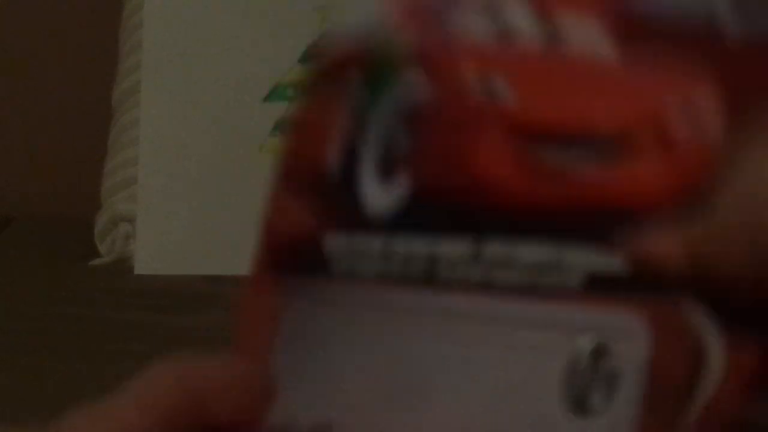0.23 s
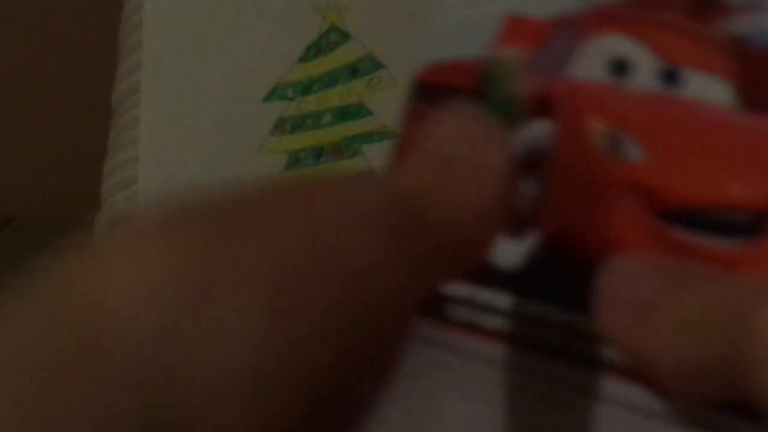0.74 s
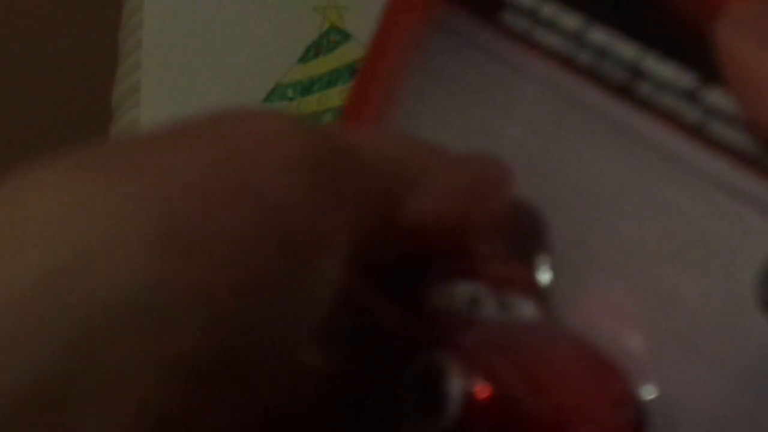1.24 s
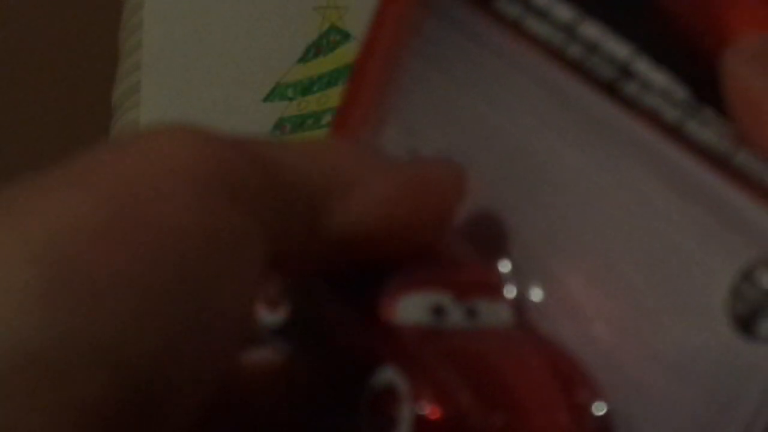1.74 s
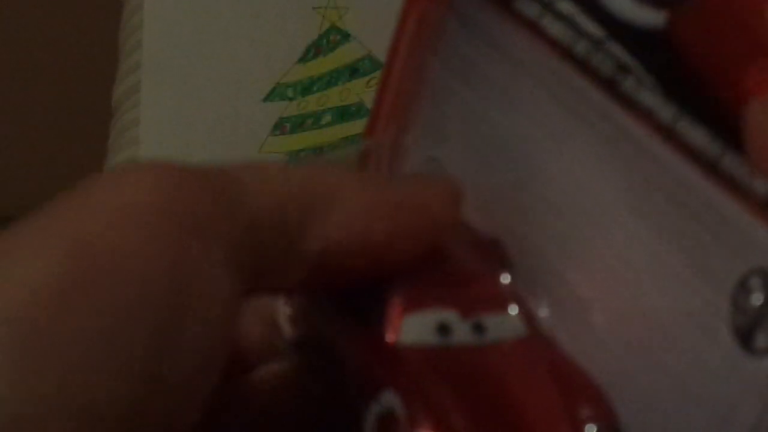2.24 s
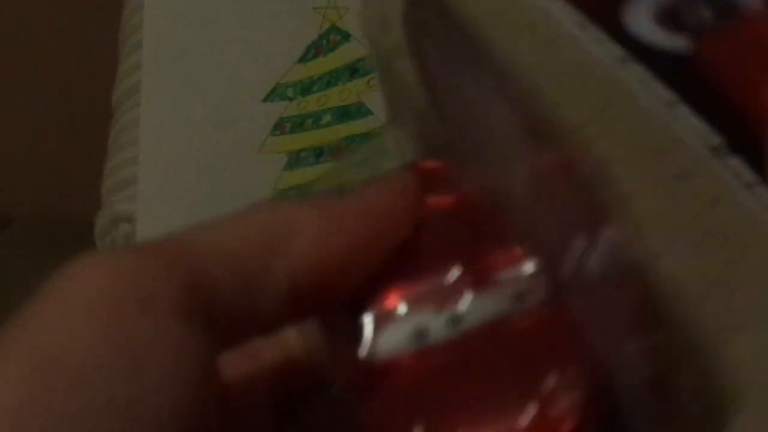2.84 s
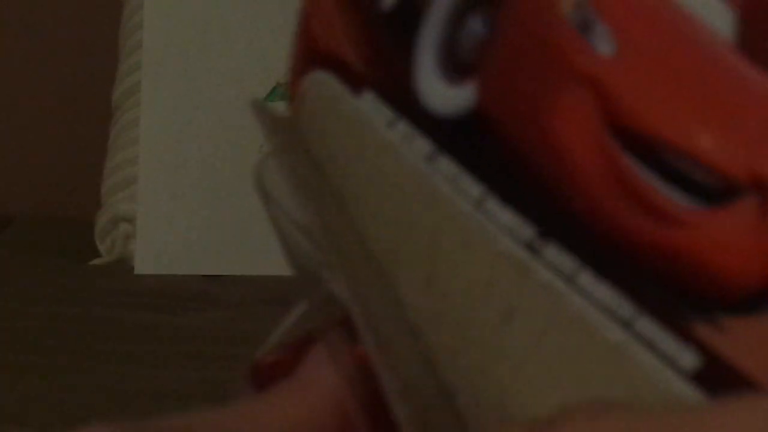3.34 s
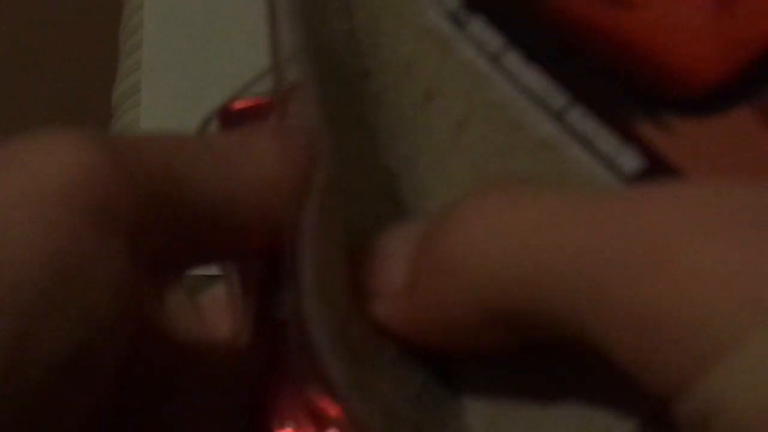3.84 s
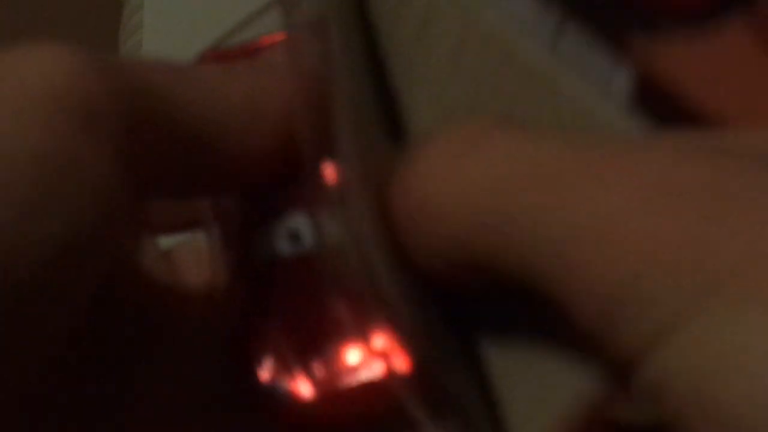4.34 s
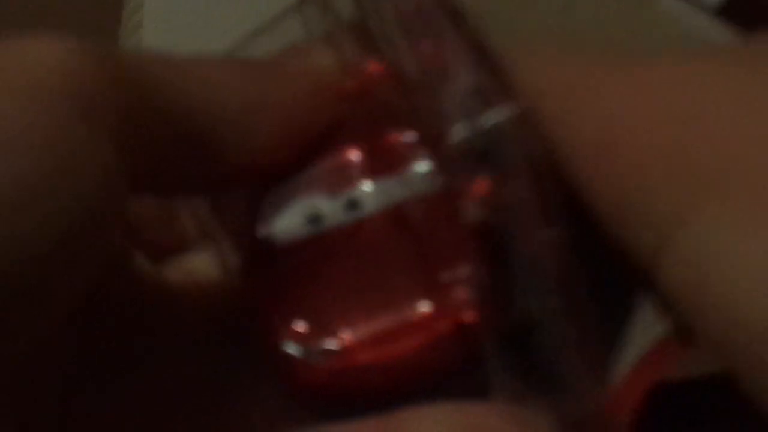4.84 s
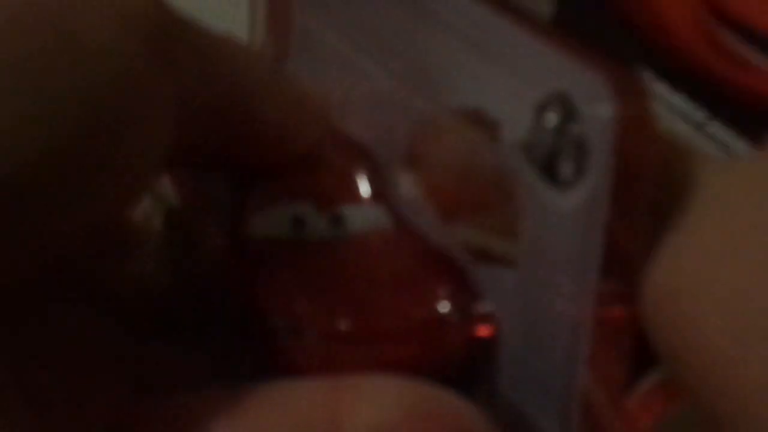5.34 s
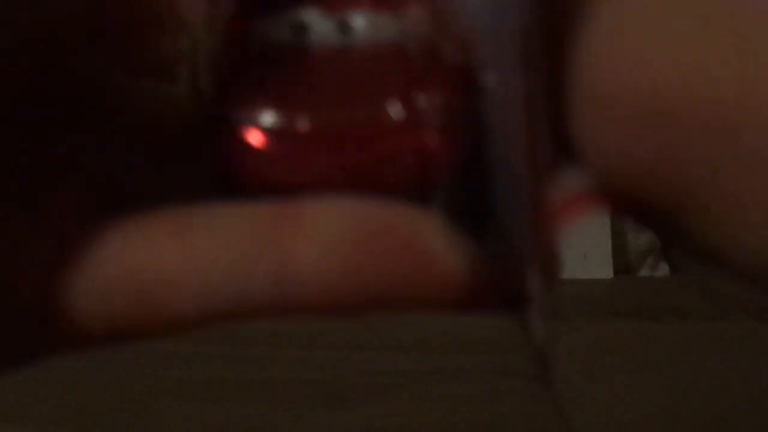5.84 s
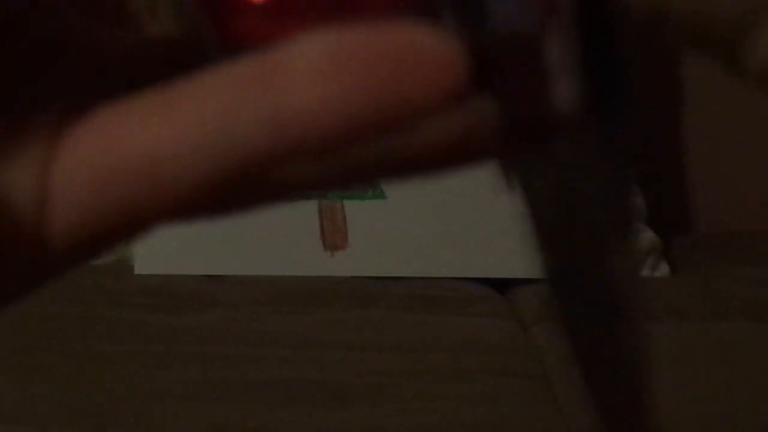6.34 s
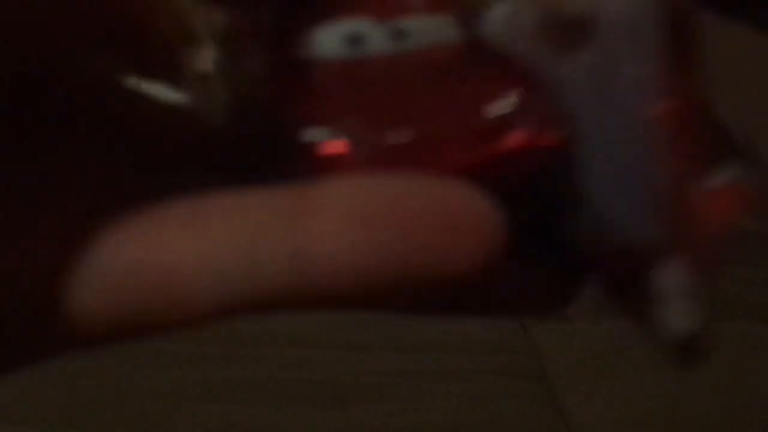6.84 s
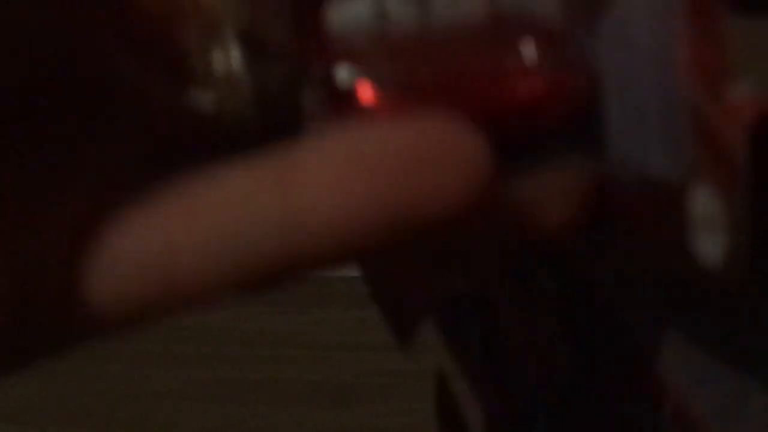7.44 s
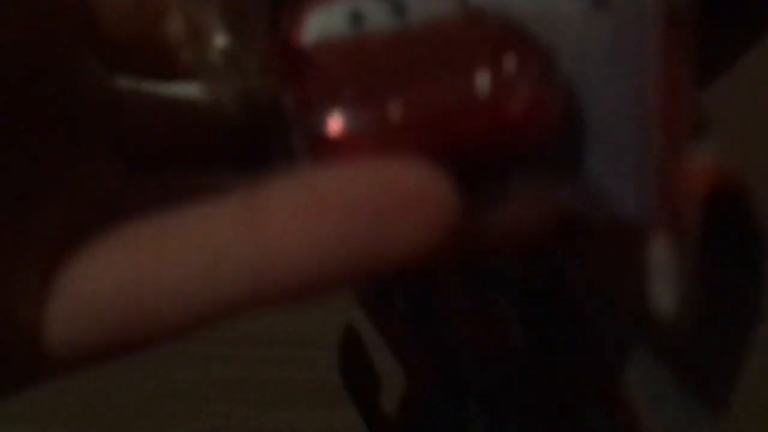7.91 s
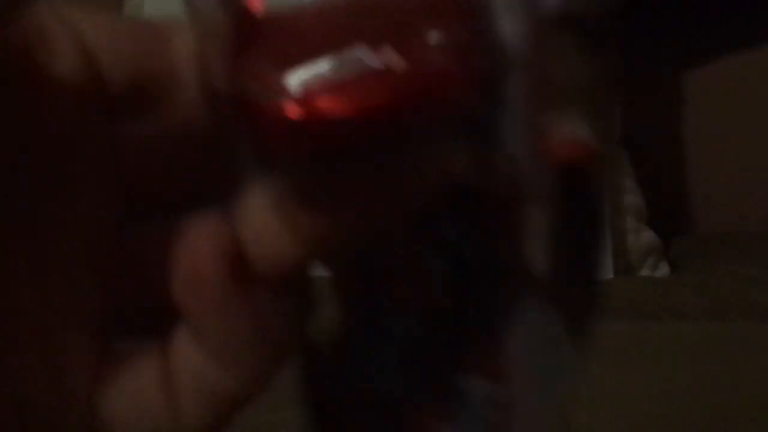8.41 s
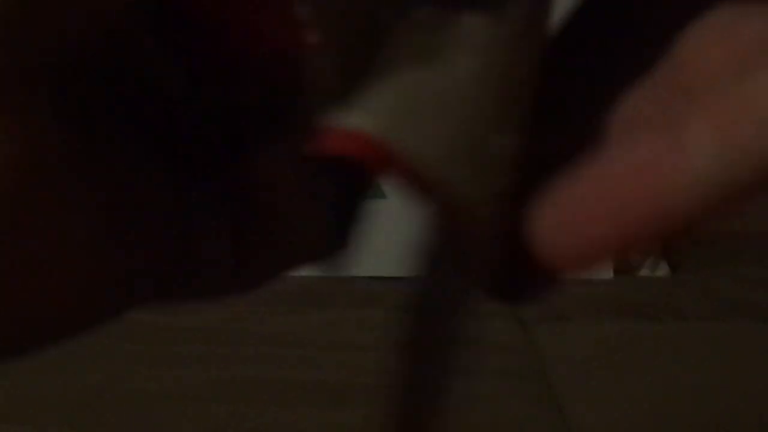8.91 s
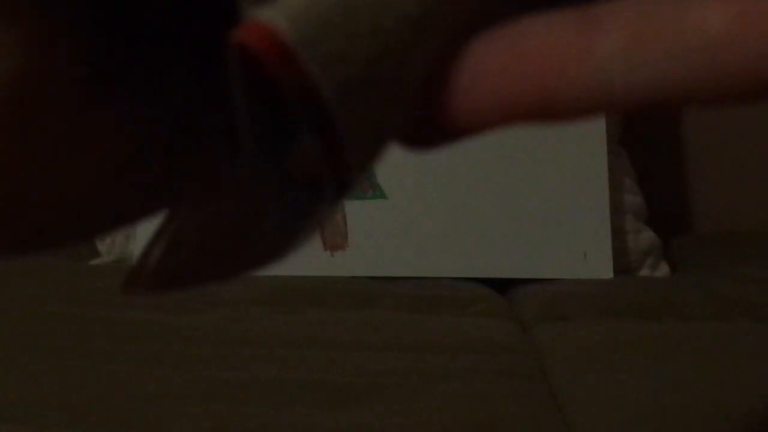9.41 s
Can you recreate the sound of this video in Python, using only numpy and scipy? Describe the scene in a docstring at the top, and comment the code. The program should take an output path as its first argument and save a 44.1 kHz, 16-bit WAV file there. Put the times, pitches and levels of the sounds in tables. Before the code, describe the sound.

Hands pry a small toy car's plastic blister off its cardboard backing. Light clicks come first, then a crisp tearing peel that ends in a firm snap. After a near-quiet pause one huge crack overloads the microphone, followed by irregular pops, creaks and rubbing that thin to faint ticks. Very close, in a small quiet room with soft background noise.

```python
"""Stiff plastic snaps and clicks as a toy's blister pack is pried off its backing card by hand.
Each snap is a crack and a dying run of slips that ring a panel; one is loud enough to overload the input.
In between, fingers rub on the pack and the glued card tears in spurts: both are streams of tiny random grains.
Skids of filtered grains and soft low bumps join in, close to the microphone in a small, quiet room."""
import sys
import numpy as np
from scipy import signal
from scipy.fft import rfft, irfft, next_fast_len
from scipy.io import wavfile

SR = 44100
rng = np.random.default_rng(int(sys.argv[2]) if len(sys.argv) > 2 else 0)


def output_pcm(signal):
    """Save a mono or channel-first signal as 16-bit PCM at the path in sys.argv[1].

    Samples are clipped to [-1, 1] before scaling.
    """
    pcm = np.clip(np.atleast_2d(signal).T, -1, 1) * 32767
    wavfile.write(sys.argv[1], SR, np.round(pcm).astype(np.int16))


N = 426447
TIME = np.arange(N) / SR

# Ranges in which the parts of the pack sound: (low Hz, high Hz)
THUMP_HZ, CARD_HZ, PLASTIC_HZ, FIZZ_HZ = (233, 450), (495, 1430), (1447, 4200), (4970, 13700)
PIVOT_HZ = 1340   # brightness tips the spectrum about this frequency
SNAP_SECONDS = .01   # the level of a snap or bump is its energy spread over this time

# Soft bumps of fingers and toy against the card.
# Each row: start in seconds, level in dB.
BUMPS = [(0.522, -46), (1.336, -52), (2.424, -49), (3.055, -51.5), (4.122, -53), (5.21, -46), (5.263, -40),
         (5.29, -53), (5.494, -43), (6.262, -51), (6.311, -57), (6.354, -63), (7.186, -49), (7.689, -45)]


def from_db(db):
    """Turns decibels into a plain factor."""
    return np.exp(np.asarray(db) * np.log(10) / 20)


def rms_one(x):
    """Scales a sound to an average strength (rms) of 1."""
    return x / np.sqrt(np.mean(x ** 2) + 1e-20)


def at_hz(points, hz):
    """Reads a table between its rows, on a log-frequency axis."""
    f, value = np.transpose(points)
    return np.interp(np.log(np.maximum(hz, 1)), np.log(f), value)


def band(x, edges_hz, order=2):
    """Keeps only the range between two frequencies."""
    edges_hz = np.clip(edges_hz, 10, SR / 2 - 500)
    sos = signal.butter(order, edges_hz, "band", fs=SR, output="sos")
    return signal.sosfilt(sos, x + 1e-18)


def boost(x, hz, width_hz, db):
    """Changes the level at one resonance; a narrow one that is lifted rings on."""
    r = np.exp(-np.pi * width_hz / SR)
    feed = np.array([1, 0, -1]) * (1 - r * r) / 2
    feedback = [1, -2 * r * np.cos(2 * np.pi * hz / SR), r * r]
    ring = signal.lfilter(feed, feedback, x)
    return x + (from_db(db) - 1) * ring


def drift(rate):
    """Random wandering: straight lines between `rate` random points per second."""
    points = rng.standard_normal(N // 20)
    return np.interp(TIME * rate, np.arange(N // 20), points)


def grains(per_s, spread_db):
    """Tiny slips at random moments, many small and a few large; rms 1."""
    sizes = from_db(spread_db * np.minimum(rng.exponential(1, N), 4))
    sizes = sizes * rng.choice([-1, 1], N)
    return rms_one(sizes * (rng.random(N) < per_s / SR))


def background(level_db=-53):
    """Steady, soft room noise: random noise shaped by a frequency curve."""
    # Colour of the noise. Each row: frequency in Hz, relative density in dB per Hz.
    noise_colour = [(20, 9), (30, -18), (65, -18.5), (140, -13), (225, -8.5), (330, -12.5), (600, -7.5),
                    (1100, -9), (2700, -16), (5200, -21), (13000, -22.5), (15000, -21)]
    size = next_fast_len(N)
    hz = np.arange(size // 2 + 1) * SR / size
    spectrum = rfft(rng.standard_normal(size)) * from_db(at_hz(noise_colour, hz))
    return from_db(level_db) * rms_one(irfft(spectrum, size)[:N])


def room(x, first_wall_s=0.0071, build_s=0.0049, dense_s=.05):
    """Single reflections from the nearest walls thicken into a diffuse tail that dies band by band."""
    # How long the tail takes to fall by 60 dB. Each row: frequency in Hz, time in seconds.
    fall_times = [(200, 0.5), (530, 0.45), (1400, 0.57), (3700, .5), (9700, 0.5)]
    # Strength of the tail. Each row: frequency in Hz, level against the direct sound in dB.
    tail_levels = [(100, -17), (300, -11), (700, -18), (1200, -15), (2100, -12), (4000, -13.5),
                   (7000, -16.5), (14000, -27)]
    t = TIME[:int(.7 * SR)]
    onset = 1 - np.exp(-np.maximum(t - first_wall_s, 0) / build_s)
    density = np.clip((t / dense_s) ** 2, .03, 1)
    present = rng.random(len(t)) < density
    reflections = rng.standard_normal(len(t)) * present / np.sqrt(density) * onset
    response, edges = 0, np.geomspace(80, 16000, 13)
    for k, (low, high) in enumerate(zip(edges, edges[1:])):
        hz = np.sqrt(low * high)
        tail = reflections * from_db(-60 * t / at_hz(fall_times, hz))
        tail = band(tail / np.linalg.norm(tail), (low, high))
        response = response + (-1) ** k * from_db(at_hz(tail_levels, hz)) * tail
    return signal.fftconvolve(x, response)[:N]


def bumps(low_hz=55, high_hz=170, fade_s=0.02):
    """Flesh is soft: it only pushes the card to and fro a few times, heard as fading low noise."""
    out, t = np.zeros(N), TIME[:SR // 8]
    for s, db in BUMPS:
        push = band(rng.standard_normal(len(t)) * np.exp(-t / fade_s), (low_hz, high_hz))
        push = push / np.linalg.norm(push) * np.sqrt(SNAP_SECONDS * SR)
        out[int(s * SR):int(s * SR) + len(t)] += from_db(db) * push
    return out


def skids(width=0.19, slips_per_s=3000, spread_db=6.5):
    """Very fast stick and slip, too irregular to make a tone; each skid swells and fades."""
    # A fingertip or an edge skids over the pack with a pitched hiss or rasp.
    # Each row: start in seconds, end in seconds, level before the swell in dB, centre in Hz.
    skid_rows = [(-.08, 0.206, -51.5, 11800), (1.3, 1.43, -50, 4570), (1.423, 1.677, -49, 8700),
                 (2.307, 2.444, -41.5, 2370), (2.412, 2.46, -33, 784), (4.71, 4.762, -29, 2270),
                 (5.79, 5.86, -49.5, 1760), (7.032, 7.15, -44.5, 11800), (7.12, 7.197, -32.5, 11900),
                 (7.38, 7.508, -49, 1980), (8.318, 8.495, -46.5, 3100)]
    out, slips = np.zeros(N), grains(slips_per_s, spread_db)
    for start, end, db, hz in skid_rows:
        on = (TIME > start) & (TIME < end)
        swell = np.sin(np.pi * (TIME[on] - start) / (end - start))
        edges_hz = hz * (1 - width / 2), hz * (1 + width / 2)   # width is a share of the centre
        out[on] += from_db(db) * swell * rms_one(band(slips[on], edges_hz))
    return out


def part_levels(db, brightness):
    """Shares a level out among thump, card, plastic and fizz along one slope in dB per octave."""
    ranges = THUMP_HZ, CARD_HZ, PLASTIC_HZ, FIZZ_HZ
    return [db + brightness * np.log2(np.sqrt(low * high) / PIVOT_HZ) for low, high in ranges]


def handling(attack_db_per_s=711, release_db_per_s=315, peel_trim_db=-5.5):
    """Level and brightness of the hands' work: strokes swell, hold and die away; the strongest leads."""
    # Fingers rub and flex the pack. Each row: start in seconds, end in seconds,
    # level in dB before the parts are trimmed, brightness in dB per octave.
    strokes = [(0, 0.105, -52, 2.5), (.25, 0.297, -53, -2), (.52, 0.579, -48.5, -2), (.825, 0.847, -52, -4),
               (0.922, 0.963, -51.5, -0.5), (1.02, 1.046, -50.5, 0), (1.336, 1.363, -47.5, 5.5),
               (2.357, 2.43, -42, 2.5), (2.41, 2.46, -34, 1.5), (2.55, 3.364, -62, -1),
               (3, 3.062, -52.5, -1), (3.238, 3.283, -49.5, -2.5), (4.373, 4.387, -46, -0.5),
               (4.4, 9.671, -60, 0.5), (4.735, 4.747, -31, 0.5), (4.919, 4.962, -45, -0.5),
               (5.178, 5.333, -47, -1), (5.52, 5.54, -45, -5.5), (5.692, 5.83, -52.5, -0.5),
               (5.95, 6.01, -51, 2), (6.296, 6.387, -38, 1), (6.687, 6.764, -50, 1),
               (6.914, 6.948, -52, 0.5), (7.155, 7.186, -37, 3.5), (7.42, 7.5, -50, -1),
               (7.572, 7.753, -53.5, -1), (7.849, 7.872, -37.5, 2.5), (8.02, 8.083, -50, 1),
               (8.15, 8.207, -49.5, -0.5), (8.361, 8.43, -49.5, 2), (8.432, 8.456, -44, 3),
               (8.89, 8.957, -54, -2), (9.201, 9.238, -56.5, 1.5), (9.28, 9.37, -56.5, 2.5),
               (9.546, 9.57, -50, -1.5), (9.647, 9.653, -44.5, -1.5)]
    # The long pull that peels the blister off its glue.
    # Each row: time in seconds, level in dB before the peel and part trims.
    peel = [(1.45, -64), (1.55, -46), (1.744, -59.5), (1.76, -51), (1.77, -51), (1.976, -45.5),
            (2.158, -49), (2.182, -41), (2.206, -43.5), (2.33, -47.5)]
    # The freed flap grows, so the peeling dulls: brightness at start and end in dB per octave.
    peel_brightness = (5.14, 2.5)

    def fade(start, end):
        """Falls away in dB before the start and after the end."""
        before, after = np.maximum(start - TIME, 0), np.maximum(TIME - end, 0)
        return -attack_db_per_s * before - release_db_per_s * after

    peel_s, peel_db = np.transpose(peel)
    peel_span = peel_s[0], peel_s[-1]
    level = np.interp(TIME, peel_s, peel_db) + peel_trim_db + fade(*peel_span)
    brightness = np.interp(TIME, peel_span, peel_brightness)
    for start, end, db, bright in strokes:
        stroke = db + fade(start, end)
        brightness = np.where(stroke > level, bright, brightness)
        level = np.maximum(level, stroke)
    return level, brightness


def rubbing(level, brightness, slips_per_s=3500, slip_spread_db=0.5,
            breaks_per_s=260, break_spread_db=2.5, break_share=0.65,
            jerk_db=2.0, jerks_per_s=130, patchy_db=2.0, patches_per_s=16,
            thump_db=-22, card_db=-9.5, plastic_db=-9.0, fizz_db=-10.5):
    """Dense friction slips with sparser fibre breaks; the pull comes in small jerks."""
    thump, card, plastic, fizz = part_levels(level, brightness)
    levels_db = np.array([thump + thump_db, card + card_db, plastic + plastic_db, fizz + fizz_db])
    jerks = rms_one(from_db(jerk_db * drift(jerks_per_s)))
    friction = grains(slips_per_s, slip_spread_db) * jerks
    breaks = break_share * grains(breaks_per_s, break_spread_db)
    # Which part rules at which Hz: 0 thump, 1 card, 2 plastic, 3 fizz
    parts = list(zip([300, 650, 1100, 1900, 3200, 6000, 11500], [0, 1, 1, 2, 2, 3, 3]))
    out, edges = 0, np.geomspace(250, 15000, 13)
    for k, (low, high) in enumerate(zip(edges, edges[1:])):
        part = at_hz(parts, np.sqrt(low * high))
        # Each part hands over smoothly to the next
        blend = np.maximum(1 - abs(np.arange(len(levels_db)) - part), 0)
        # As the grip moves, it favours now one range, now another
        patch_db = patchy_db * drift(patches_per_s)
        # Fibre breaks are too small to shake the whole card
        crackle = friction + breaks * min(part, 1)
        gain = from_db(blend @ levels_db + patch_db)
        out = out + (-1) ** k * gain * rms_one(band(crackle, (low, high)))
    return out


def crinkles(level, brightness, count=45, above_db=0.0, spread_db=3.0, loudest_db=-52,
             settle_ms=(1.0, 7.0), ring_hz=1400, ring_octaves_per_slope=0.28, ring_spread_octaves=0.44):
    """Faint small creases give way at random; strength follows the handling up to a low cap,
    brightness follows it fully. Gives rows for snaps()."""
    when, slow = rng.random((count, 2)).T
    size, panel = rng.standard_normal((count, 2)).T
    at = (when * N).astype(int)
    db = np.minimum(level[at] + above_db + spread_db * size, loudest_db)
    octaves = ring_octaves_per_slope * brightness[at] + ring_spread_octaves * panel
    hz = ring_hz * 2 ** np.clip(octaves, -2, 2)
    settle = np.interp(slow, (0, 1), settle_ms)
    return list(zip(at / SR, db, brightness[at], settle, hz))


def pack(x):
    """The snaps and the rubbing pass through the resonances of the half-open pack."""
    # Each row: frequency in Hz, width in Hz, boost in dB.
    resonances = [(330, 13, -0.5), (396, 47, 4), (580, 190, -2.5), (729, 125, 5), (1100, 290, 5),
                  (1850, 310, 4), (2390, 860, 2.5), (3300, 210, 1.5), (6740, 1140, 0), (11800, 1800, 1)]
    for hz, width_hz, db in resonances:
        x = boost(x, hz, width_hz, db)
    return x


def snap_levels(s, level_db, brightness, settle_ms, bump_near_s=.006, bump_thump_db=9.5,
                typical_settle_ms=4.0, quick_db=2.5, quick_limit_db=2.5):
    """Part levels of one snap: a bump shakes the whole card, a quick buckle rings the plastic harder."""
    thump, card, plastic, fizz = part_levels(level_db, brightness)
    bumped = any(abs(s - bump_s) < bump_near_s for bump_s, _ in BUMPS)
    # quick_db is added for each halving of the settling time, up to the limit
    quick = quick_db * np.log2(typical_settle_ms / abs(settle_ms))
    quick = np.clip(quick, -quick_limit_db, quick_limit_db)
    return thump + bump_thump_db * bumped, card, plastic + quick, fizz


def snaps(rows, crack_ms=3.66, give=0.31, ring_db=11.0, ring_width_hz=170,
          thump_db=-19.5, card_db=-1.5, plastic_db=-1.0, fizz_db=-8.5,
          card_settle=0.97, plastic_settle=0.99, fizz_settle=0.55):
    """A crease pops through: one crack, then a dying run of slips that shakes the card and rings a panel."""
    out, t = np.zeros(N + SR), TIME[:SR // 16]
    t_ms = t * 1e3
    # Each part: range in Hz, trim in dB, factor on the settling time
    parts = [(THUMP_HZ, thump_db, card_settle), (CARD_HZ, card_db, card_settle),
             (PLASTIC_HZ, plastic_db, plastic_settle), (FIZZ_HZ, fizz_db, fizz_settle)]
    filters = [signal.butter(3, edges_hz, "band", fs=SR, output="sos") for edges_hz, *_ in parts]
    for s, level_db, brightness, settle_ms, ring_hz in rows:
        slips = rng.standard_normal(len(t)) * rng.exponential(1, len(t))
        sign, start = rng.choice([-1, 1]), int(s * SR)
        levels = snap_levels(s, level_db, brightness, settle_ms)
        for (_, trim_db, stretch), sos, db in zip(parts, filters, levels):
            force = slips * np.exp(-t_ms / (abs(settle_ms * stretch) + .1))
            force *= 1 - np.exp(-t_ms / abs(give * settle_ms))   # a slow crease gives way gradually
            force /= np.linalg.norm(force)
            # Quick buckles are nearly one clean crack
            force[0] += sign * (crack_ms / max(settle_ms, 1)) ** 1.8
            sound = boost(signal.sosfilt(sos, force + 1e-18), ring_hz, ring_width_hz, ring_db)
            sound = sound / np.linalg.norm(sound) * np.sqrt(SNAP_SECONDS * SR)
            out[start:start + len(t)] += sound * from_db(db + trim_db)
    return out[:N]


def scene(pack_db=-1.5, apart_db=-29, treble_apart_db=-14, bass_apart_db=-11, bass_apart_hz=(15, 110),
          side_noise_db=-77, side_noise_hz=(3800, 15000)):
    """Mixes all layers; left and right differ slightly, by faint high noise and a quiet second random tail."""
    # The blister buckles or knocks on the card; stiff little creases are bright, broad panels dull.
    # Each row: start in seconds, level in dB before the trims, brightness in dB per octave,
    # basic settling time of the crease in ms, panel ring in Hz.
    snap_rows = [(.2503, -46.5, -7, 6.1, 516), (.4641, -42.5, -2.5, 6.3, 1310), (.518, -37, -1, 3.4, 1310),
                 (.522, -41, -7.5, 3.2, 720), (.5596, -37, -3, 4, 1780), (.7546, -46.5, 0, 3.1, 1760),
                 (.798, -48, -2, 7, 1480), (.835, -46, 0, 2.6, 1290), (.924, -36.5, 0.5, 5.2, 1580),
                 (.9928, -47.5, 5.5, 3.6, 1290), (1.0304, -39.5, -2, 6.5, 1280),
                 (1.1025, -41.5, -9.5, 3.9, 880), (1.2654, -66, 8.5, .7, 870), (1.302, -56, 9.5, 5.1, 4500),
                 (1.3349, -32, 6, 7, 4420), (1.4823, -65.5, 11, .6, 4350), (1.5543, -56, 8, .6, 2510),
                 (1.7574, -49, 5.5, 5.8, 2580), (1.7963, -51.5, 7, 6.5, 2500), (1.8451, -58, 5, .5, 3890),
                 (1.889, -49, 4, 7.3, 3940), (1.9084, -48, 3, 3.3, 2330), (1.938, -51, 4, 4.8, 3980),
                 (1.964, -46, 4.5, 5.6, 4030), (2.1808, -46.5, 3, 2.2, 2900), (2.232, -46, 3, 4.6, 3150),
                 (2.4202, -27.5, -1, 4.5, 790), (2.4235, -24, -1, 6.6, 760), (2.4374, -28.5, 1, 4.2, 1240),
                 (2.7, -52, 4.5, 6, 1980), (2.9231, -55, 0.5, 2, 4000), (3.0038, -35, -2.5, 3.9, 1140),
                 (3.0564, -43, -2, 3.6, 765), (3.2534, -43, -5, 10, 700), (3.2911, -49.5, -4, 4.3, 1090),
                 (3.3872, -50.5, -5.5, 6.2, 1030), (4.0983, -39.5, -9, 3.3, 1720),
                 (4.1122, -6, -0.06, 2.9, 1987), (4.119, -20, -1.5, 3.4, 1090),
                 (4.4865, -46.5, -3, 1.6, 2240), (4.502, -41, -4.5, 2.2, 1150),
                 (4.5316, -31.5, -1, 2.2, 1150), (4.7183, -26.5, 1.5, 2.8, 3150),
                 (4.7255, -28, 0, 2.4, 1820), (4.7481, -28.5, -0.5, 3.2, 1270), (4.9225, -32, -1, 4.4, 980),
                 (4.9709, -43.5, 2, 2.7, 2050), (5.1707, -49.5, 4.5, 4.1, 1970),
                 (5.2078, -41.5, -2.5, 5.3, 1400), (5.2622, -39, -3, 5.2, 820),
                 (5.2989, -39.5, 1, 3.6, 2900), (5.4959, -31, -3, 3.6, 1060), (5.5127, -41, 0, 5.5, 1760),
                 (5.7163, -45.5, 0.5, 5, 1170), (5.7723, -43, -4.5, 9, 1320), (6.261, -32, 0, 5.1, 615),
                 (6.2675, -37, 5.5, 5, 2130), (6.275, -41.5, 8, 3.7, 1790), (6.2897, -31.5, 1, 7, 710),
                 (6.3097, -26.5, .5, 6.6, 870), (6.3542, -30, -0.5, 4, 1370), (6.5773, -45, 3, 2.5, 3060),
                 (6.9721, -50, -3, 4.6, 1180), (7.1185, -63.5, 10.5, 1.1, 1700),
                 (7.1576, -41, -5, 3.9, 604), (7.1763, -17, -0.7, 3.6, 667), (7.4045, -42, 0, 12, 1940),
                 (7.508, -47.5, -6.5, 4, 696), (7.536, -43, 0, 2.3, 2500), (7.6898, -38, -1.5, 2.9, 780),
                 (7.8451, -27.5, 4, 5, 2320), (7.8743, -27, 0.5, 5.6, 2060), (8.0223, -46, -4, 3.7, 1190),
                 (8.0473, -39, -1.5, 3.9, 1200), (8.138, -40.5, -1, 2.1, 1140),
                 (8.165, -37, -5.5, 4.4, 1040), (8.3421, -44, -2.5, 2.6, 950), (8.4623, -54, 7, 1.4, 2920),
                 (8.5738, -53, -4, 5.6, 1230), (8.803, -55, 1, 2.4, 2400), (8.8236, -53, -2, 2.7, 1170),
                 (8.8536, -49.5, -2, 3.4, 2450), (8.9463, -49.5, -2.5, 4.7, 803), (9.0768, -58, -8, 5, 680),
                 (9.4586, -58, 6, 3.3, 1150)]
    level, brightness = handling()
    buckling = snaps(snap_rows + crinkles(level, brightness))
    on_pack = pack(buckling + rubbing(level, brightness))
    hands = from_db(pack_db) * on_pack + skids() + bumps()
    # A quiet second random tail, added to the left and taken from the right, with extra treble and bass
    second_tail = room(hands)
    treble_apart = from_db(treble_apart_db) * np.diff(second_tail, prepend=0)
    bass_apart = from_db(bass_apart_db) * band(second_tail, bass_apart_hz, order=1)
    apart = from_db(apart_db) * second_tail + treble_apart + bass_apart
    # Faint high noise, independent in each channel
    side_noise = from_db(side_noise_db) * rms_one(band(rng.standard_normal((2, N)), side_noise_hz))
    return hands + room(hands) + apart * np.array([[1], [-1]]) + background() + side_noise


def record(dry, overload=2.1, low_cut_hz=90, mic_top_hz=14300, cutoff_hz=15000):
    """The microphone dulls the very top; then overload, low cut, full-scale limit and a steep top cut."""
    mic = signal.butter(3, mic_top_hz, fs=SR, output="sos")
    low_cut = signal.butter(1, low_cut_hz, "high", fs=SR, output="sos")
    top_cut = signal.ellip(12, .2, 70, cutoff_hz, fs=SR, output="sos")
    heard = signal.sosfilt(mic, dry)
    overloaded = np.clip(heard, -overload, overload)   # flattens peaks beyond what the input can take
    limited = np.clip(signal.sosfilt(low_cut, overloaded), -1, 1)
    return signal.sosfilt(top_cut, limited)


dry = scene()
out = record(dry)
output_pcm(out)
```